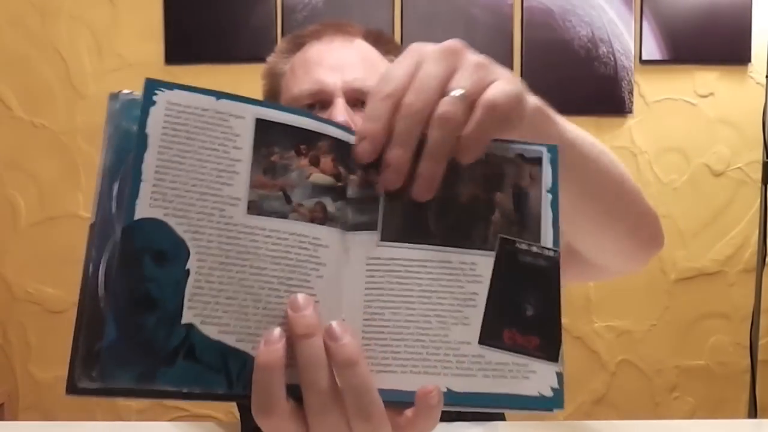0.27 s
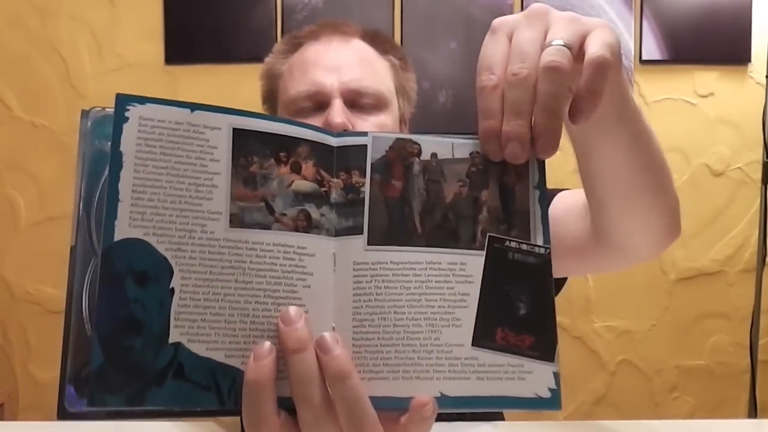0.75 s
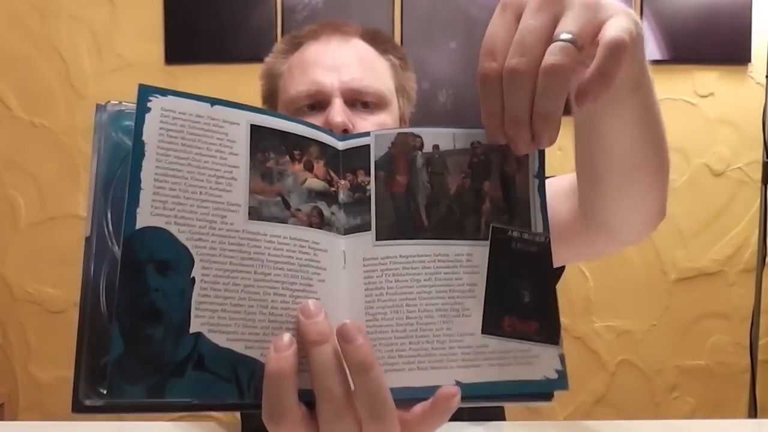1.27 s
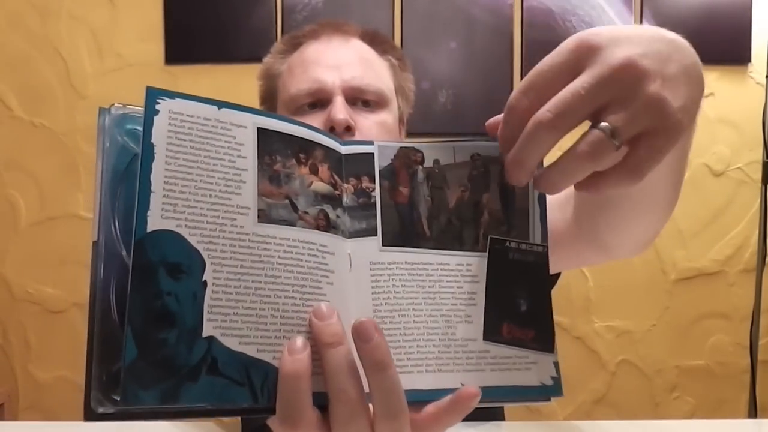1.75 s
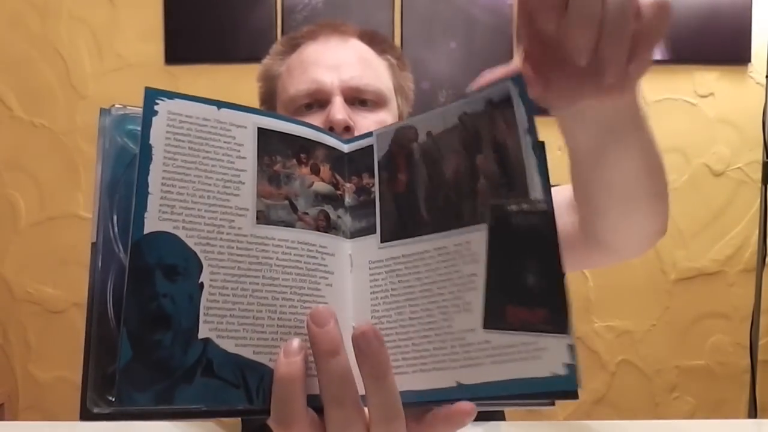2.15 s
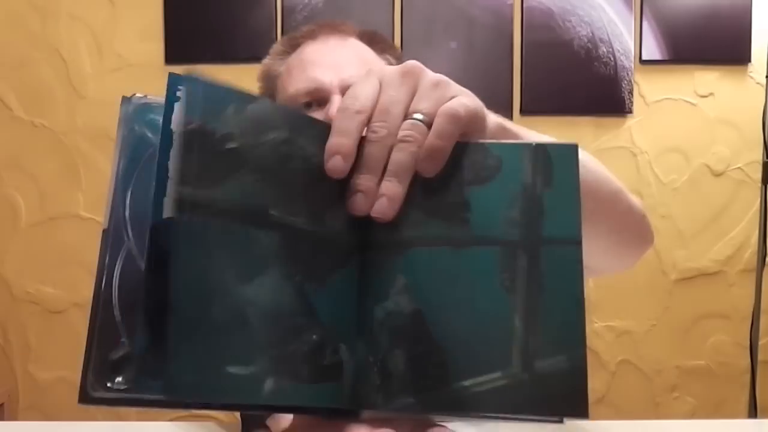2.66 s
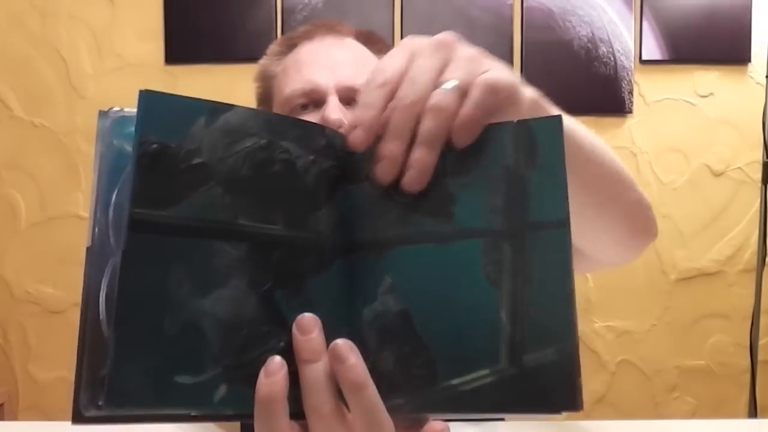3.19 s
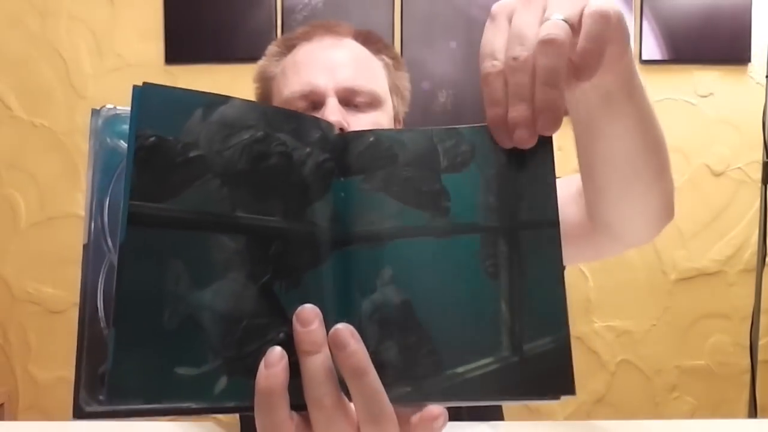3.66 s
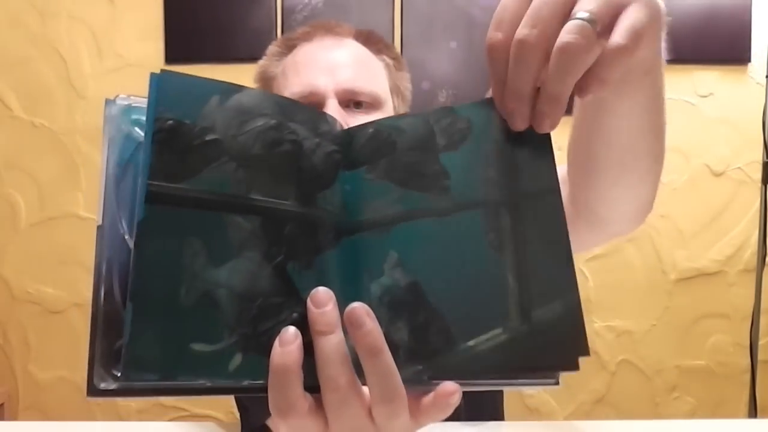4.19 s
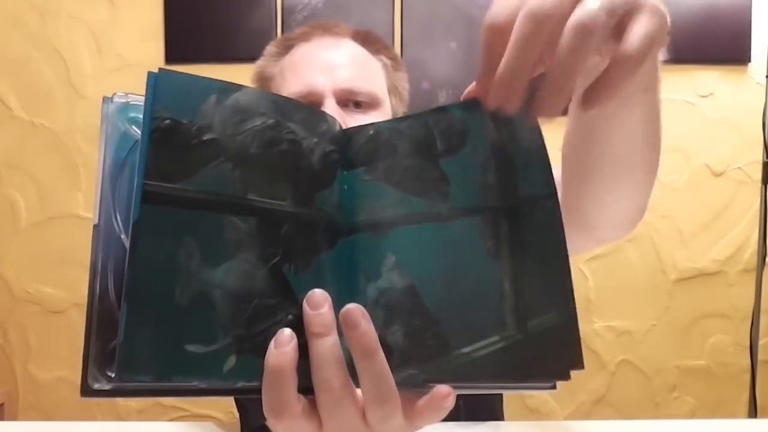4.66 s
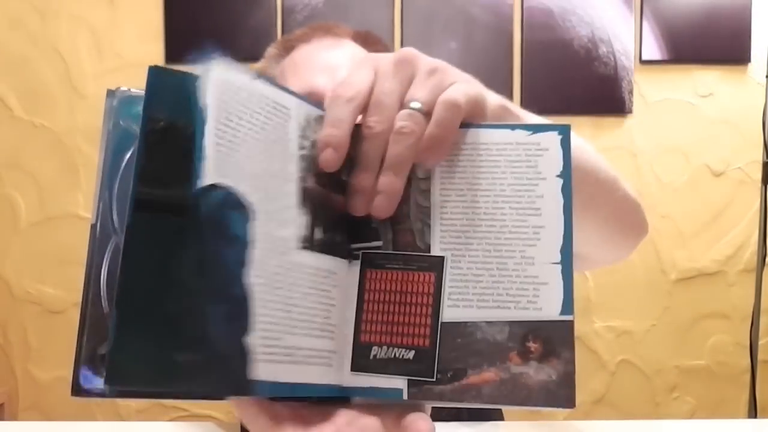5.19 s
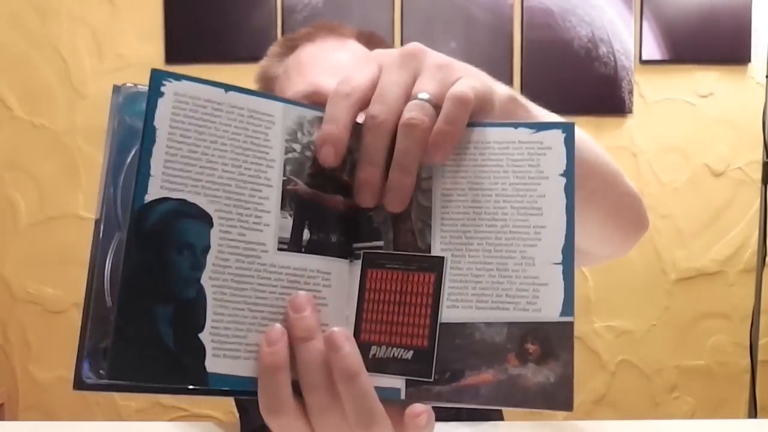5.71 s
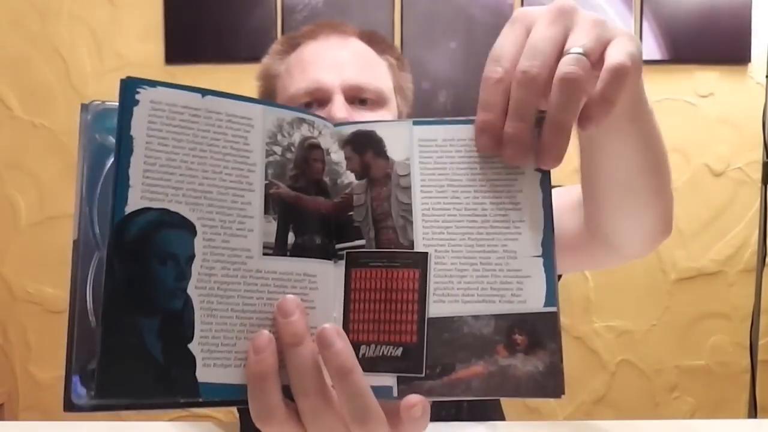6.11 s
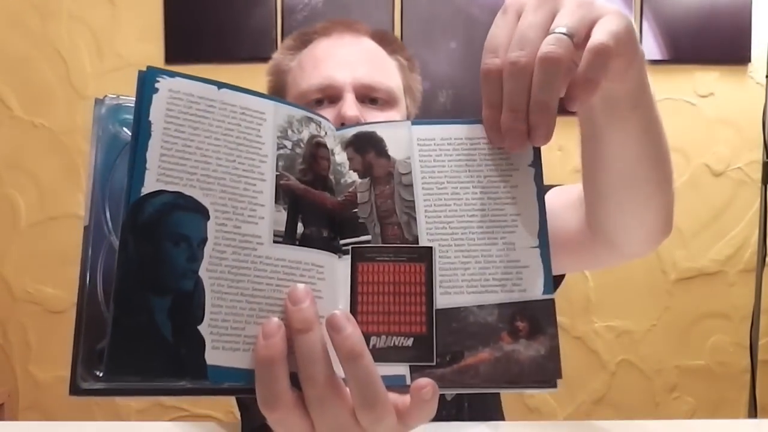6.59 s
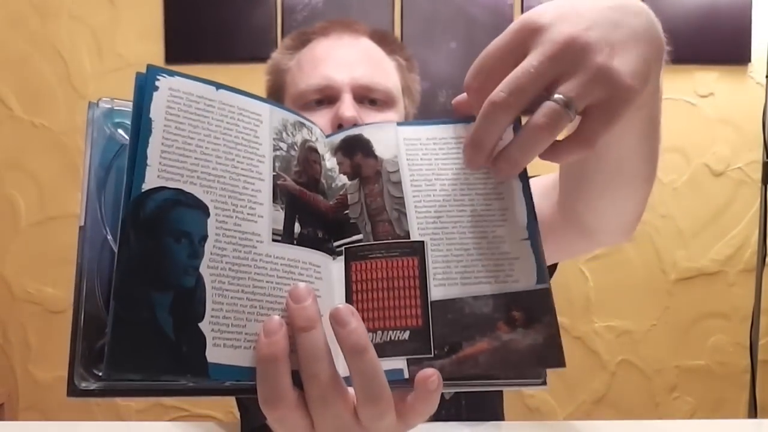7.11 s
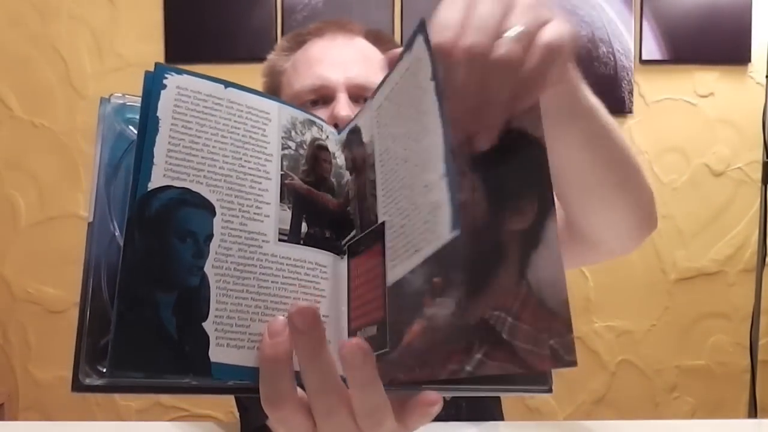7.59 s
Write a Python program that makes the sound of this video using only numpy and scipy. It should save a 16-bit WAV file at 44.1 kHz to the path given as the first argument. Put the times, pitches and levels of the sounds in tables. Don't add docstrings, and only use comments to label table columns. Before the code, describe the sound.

Close in front of the microphone, fingers leaf through a thick hardcover book. Faint touches and knocks come first, then bursts of crisp corner snaps, a page bumping over, an airy swish and slight binding creaks. Snaps return after four seconds, another page swings over, and the sharpest snap lands near seven seconds before the rustling thins. Small quiet room, short echo, faint hiss and mains hum.

```python
import sys
import numpy as np
from scipy import signal
from scipy.io import wavfile
from scipy.ndimage import uniform_filter1d

SR = 44100
rng = np.random.default_rng(int(sys.argv[2]) if len(sys.argv) > 2 else 0)


def wrap_up_sound(samples):
    columns = np.atleast_2d(samples).T
    tamed = np.clip(columns, -1, 1)
    steps = np.round(tamed * 32767).astype(np.int16)
    wavfile.write(sys.argv[1], SR, steps)


def voltage_ratio(level):
    return 10 ** (np.asarray(level, float) / 20)


N = 346185
LEAD_S = 0.005
BOARD_HZ = 1330


def evened(x):
    return x / np.sqrt(np.mean(x ** 2) + 1e-20)


def peaked(x, db):
    return voltage_ratio(db) * x / np.sqrt(uniform_filter1d(x ** 2, 44).max())


def read(points, hz):
    f, value = np.transpose(points)
    return np.interp(np.log(hz + 1), np.log(f + 1), value)


def add(mix, s, sound):
    start = max(round((s - LEAD_S) * SR), 0)
    part = mix[start:][:len(sound)]
    part += sound[:len(part)]


def sides(pan_db):
    return voltage_ratio(np.array([[pan_db], [-pan_db]]) / 2)


def colour(x, spectrum):
    hz = abs(np.fft.fftfreq(4096, 1 / SR))
    log_gain = np.log(voltage_ratio(np.maximum(read(spectrum, hz), -100)))
    taps = np.fft.ifft(np.exp(np.conj(signal.hilbert(log_gain)))).real[:2048]
    taps = taps / np.linalg.norm(taps)
    return signal.oaconvolve(x, taps[None], axes=-1)[:, :N]


def ring(x, hz, width_hz):
    r = np.exp(-np.pi * width_hz / SR)
    return signal.lfilter([1, 0, -1], [1, -2 * r * np.cos(2 * np.pi * hz / SR), r * r], x)


def resonate(x, hz, width_hz):
    turn = np.exp(2j * np.pi * np.cumsum(hz) / SR)
    r = np.exp(-np.pi * width_hz / SR)
    return (turn * signal.lfilter([1 - r], [1, -r], x / turn)).real


def facing_page(x, hz, share, spacing_hz):
    delay = np.round(hz / spacing_hz) / hz * SR
    at = np.arange(len(x))
    return x + share * np.interp(at - delay, at, x)


def slips(per_s, spread_db, clump_db, clump_s):
    size = voltage_ratio(spread_db * np.minimum(rng.exponential(1, N), 5))
    size = size * (rng.random(N) < per_s / SR)
    clumps = uniform_filter1d(rng.standard_normal(N), max(int(clump_s * SR), 2))
    clumps = evened(uniform_filter1d(clumps, 40))
    return evened(size * rng.standard_normal(N) * voltage_ratio(clump_db * clumps))


def burst(grit, build_s, crack_s, skid_db, skid_s):
    t = np.arange(len(grit)) / SR - LEAD_S
    before = (1 + voltage_ratio(skid_db)) * np.exp(-abs(t) / build_s)
    after = np.exp(-abs(t) / crack_s) + voltage_ratio(skid_db) * np.exp(-abs(t) / skid_s)
    return grit * np.where(t < 0, before, after)


def hush():
    # (pitch [Hz], rms level [dB])
    hum_tones = [(50, -87.5), (100, -93.5)]
    # (frequency [Hz], level [dB per Hz])
    hush_colour = [(12, -20), (20, -11), (53, -9.5), (126, -5.5), (208, -5.5), (385, -6), (1350, -2),
                   (2710, -12.5), (5150, -11), (10900, -13), (15700, -14.5)]
    t = np.arange(N) / SR
    hum = sum(voltage_ratio(db) * np.sqrt(2) * np.sin(2 * np.pi * hz * t) for hz, db in hum_tones)
    hiss = colour(rng.standard_normal((2, N)), hush_colour)
    return voltage_ratio(-63) * hiss + hum


def room(x):
    # (frequency [Hz], time to fall by 60 dB [s])
    echo_times = [(300, 0.36), (1200, 0.13), (4000, 0.12), (12000, 0.12)]
    taps = np.zeros((2, SR // 2))
    at = np.arange(200, SR // 2 - 20, 20) + rng.integers(0, 20, (2, (SR // 2 - 201) // 20))
    np.put_along_axis(taps, at, rng.choice([-1., 1.], at.shape), 1)
    hz, t, bands = signal.stft(taps, SR, nperseg=256)
    fading = voltage_ratio(-60 * t / read(echo_times, hz)[:, None])
    tail = signal.istft(bands * fading, SR, nperseg=256)[1]
    tail = tail / np.linalg.norm(tail[0])
    return signal.fftconvolve(x.mean(0)[None], tail, axes=1)[:, :N]


def swishes():
    # (start [s], length [s], level [dB], centre [Hz])
    swings = [
        (2.16, .17, -68, 10000),
        (3.244, 0.17, -61.5, 10500),
        (3.525, .11, -61.5, 9000),
        (5.15, 0.22, -59.5, 11900),
        (5.84, .16, -65, 11000),
        (6.04, .12, -68.5, 12000),
    ]
    out, air = np.zeros(N), rng.standard_normal(N)
    for s, length, db, hz in swings:
        part = air[round(s * SR):round((s + length) * SR)]
        along = np.linspace(0, 1, len(part))
        swell = np.sin(np.pi * along ** 1.1)
        add(out, s + LEAD_S, voltage_ratio(db) * evened(ring(part, hz, width_hz=11000)) * swell)
    return out


def creaks():
    # (start [s], end [s], first pitch [Hz], last pitch [Hz], level [dB])
    flexes = [
        (1.693, 1.776, 387, 383, -74.5),
        (2.165, 2.333, 119.2, 200, -78),
        (2.45, 2.55, 280, 328, -69.5),
        (3.471, 3.548, 405, 472, -73.5),
        (3.485, 3.7, 673, 652, -76),
    ]
    out, t = np.zeros(N), np.arange(N) / SR
    for start, end, from_hz, to_hz, db in flexes:
        along = np.clip((t - start) / (end - start), 0, 1)
        turns = np.cumsum(from_hz + (to_hz - from_hz) * along) / SR
        wander = uniform_filter1d(uniform_filter1d(rng.standard_normal(N), size=900), size=900)
        flutter = 1 + 0.5 * evened(wander)
        swell = np.sin(np.pi * along) ** 0.5
        out += voltage_ratio(db) * np.sqrt(2) * flutter * np.sin(2 * np.pi * turns) * swell
    return out


def hoots():
    # (start [s], length [s], pitch [Hz], level [dB])
    board_songs = [(1.204, 0.068, 1490, -52.5), (1.332, 0.047, 1440, -47.5), (2.513, 0.029, 1060, -76),
                   (2.719, 0.019, 1440, -47), (3.79, 0.063, 1250, -53.5), (4.135, 0.074, 1450, -47.5),
                   (5.35, 0.011, 1100, -54), (6.393, 0.24, 1280, -66.5), (6.586, 0.02, 1280, -56),
                   (6.699, 0.069, 2280, -51), (7.094, 0.017, 1480, -44)]
    out, rub = np.zeros(N), slips(per_s=6000, spread_db=2.2, clump_db=2, clump_s=0.006)
    for s, length, hz, db in board_songs:
        part = rub[round(s * SR):round((s + length) * SR)]
        along = np.linspace(0, 1, len(part))
        tone = evened(ring(ring(part, hz, width_hz=125), hz, width_hz=710))
        add(out, s + LEAD_S, voltage_ratio(db) * tone * np.sin(np.pi * along) ** 0.34)
    return out


def twangs():
    # (time of peak [s], peak level [dB], pitch [Hz], length [s])
    bends = [(.085, -55, 1300, 0.00092), (0.27, -50.5, 1220, 0.0019), (0.32, -46, 1100, 0.0016),
             (.33, -53, 1220, 0.0013), (0.421, -48.5, 1285, 0.0031), (1.1, -42, 1520, 0.00078),
             (1.408, -28, 1740, 0.00081), (1.436, -35, 1430, 0.0017), (1.946, -42, 3660, 0.0022),
             (1.9562, -27.5, 3700, 0.0017), (1.9565, -34.5, 7100, 0.0017), (1.955, -41, 2100, 0.0036),
             (2.132, -61, 1130, 0.005), (2.6625, -46, 1500, .0015), (2.677, -44, 1400, .0015),
             (2.707, -48, 1550, .002), (2.7287, -36, 1410, .0012), (2.7348, -37, 1480, 0.0013),
             (2.737, -46, 2560, 0.0012), (4.259, -37.5, 1750, 0.0005), (4.284, -33, 1600, 0.00089),
             (4.297, -39, 1480, 0.0015), (4.347, -40, 1890, 0.0006), (4.3649, -42, 1900, 0.0011),
             (4.7806, -34.5, 1370, 0.0011), (6.775, -38, 1030, 0.0013), (6.9676, -25, 1920, 0.00042),
             (6.9679, -28, 7000, 0.00046), (6.968, -35, 10600, .0006), (6.973, -61, 110, 0.0018),
             (6.9745, -38, 1950, 0.0014), (6.9782, -28.5, 1620, 0.00082), (6.989, -28, 1310, 0.0013),
             (7.206, -44, 2040, 0.0025), (5.408, -55, 2100, .0015), (2.989, -51, 2240, 0.0032),
             (5.357, -42, 1460, .002)]
    out, t = np.zeros(N), np.arange(600) / SR - LEAD_S
    for (s, db, hz, length), turn in zip(bends, rng.random(len(bends))):
        swell = np.exp(-(t / length) ** 2)
        swell = swell + 0.042 * (t > 0) * np.exp(-abs(t) / (2 * length))
        turns = hz * t * (1 - 8 * t) + (1 + turn) / 6
        add(out, s, voltage_ratio(db) * np.sqrt(2) * swell * np.sin(2 * np.pi * turns))
    return out


def knocks():
    # (time of peak [s], peak level [dB], board pitch [Hz])
    bumps = [(0.1577, -49, 1330), (0.226, -47, 1200), (0.363, -50, 1180.0), (0.526, -52, 1100),
             (1.268, -42, 1020), (1.6635, -50, 1110), (2.5328, -35, 960), (2.679, -35, 1400),
             (2.723, -35, 1470), (3.084, -45, 1020), (3.807, -45, 1210), (3.9901, -36.5, 1540),
             (4.197, -39, 1320), (5.259, -41.5, 1600), (5.3543, -33.5, 1040), (5.5693, -52, 834),
             (5.6043, -54, 1040), (5.6197, -48, 1130), (5.625, -44.5, 1110), (5.74, -40, 1150),
             (3.2325, -40.5, 1040), (6.166, -40, 1170), (6.212, -48, 1250), (6.591, -39, 1220),
             (6.973, -30, 1490), (6.984, -40, 1500), (7.288, -61, 1270.0), (7.6, -50.5, 1030)]
    board = np.zeros(N)
    for (s, db, hz), grit in zip(bumps, rng.standard_normal((len(bumps), 1500))):
        blow = burst(grit, build_s=0.00073, crack_s=0.0037, skid_db=-30, skid_s=0.012)
        thud = ring(ring(blow, hz, width_hz=310), hz, width_hz=400)
        add(board, s - 0.0009, peaked(thud, db - 7.5))
    return board


def pecks():
    # (time [s], sheet peak [dB], sheet pitch [Hz], board peak [dB])
    single_slips = [(.0845, -68, 3020, -60), (.1405, -59, 4500, -59), (.181, -54, 5070, -62),
                    (.202, -62, 5000, -61), (.2705, -58, 4500, -60), (0.3189, -46.5, 4700, -46),
                    (0.33, -53, 5000, -54), (0.417, -63, 4000, -54), (.49, -62, 3000, -54),
                    (.555, -64, 6500, -59), (1.0034, -52, 4500, -50), (1.526, -49, 6300, -47),
                    (1.638, -58, 4000, -58), (1.746, -45.5, 6300, -49), (1.771, -49, 4000, -58),
                    (1.7956, -40, 4220, -42), (1.9561, -39, 3750, -37.5), (2.108, -60, 3500, -62),
                    (2.588, -54, 5000, -60), (2.701, -49, 4000, -49), (2.9255, -65, 6900, -64),
                    (3.1487, -56, 3500, -48), (3.2317, -51, 3600, -62), (3.392, -70, 3000, -75),
                    (4.021, -54, 4200, -44), (4.0372, -43, 6540, -43), (4.259, -33, 4480, -34.5),
                    (4.282, -34, 4500, -34), (4.408, -46, 4300, -44), (4.5255, -60, 4500, -54),
                    (4.63, -54, 3500, -73), (4.6962, -58, 3000, -55), (4.714, -54, 3700, -57),
                    (4.7532, -54, 6800, -64), (4.931, -58, 4000, -54.5), (5.422, -60, 5500, -58),
                    (5.5148, -64, 4000, -57), (5.589, -56, 6500, -55), (5.685, -54, 3500, -57),
                    (5.6978, -54, 4000, -52), (5.77, -60, 5500, -60), (5.783, -51, 7500, -60),
                    (6.484, -56, 4200, -53), (6.888, -53, 4000, -50), (6.893, -56, 4200, -51),
                    (6.9672, -24.5, 4000, -27), (7.0616, -44, 4000, -39), (7.142, -52, 8000, -54),
                    (7.4155, -59, 5000, -57), (7.657, -56, 5000, -66)]
    sheet, board = np.zeros((2, N))
    lead = round(LEAD_S * SR)
    grits = rng.standard_normal((len(single_slips), 1200))
    for (s, sheet_db, hz, board_db), grit in zip(single_slips, grits):
        slip = 0.3 * burst(grit, build_s=0.0001, crack_s=0.0006, skid_db=-14, skid_s=0.003)
        slip[[lead, lead + 38]] += [-2, 1.3]
        paper = evened(slip) + 0.42 * evened(ring(slip, hz, width_hz=720))
        add(sheet, s, peaked(paper, sheet_db))
        add(board, s, peaked(ring(ring(slip, 1180, width_hz=330), 2120, width_hz=410), board_db))
    return sheet, board


def snaps():
    # (time of peak [s], peak level [dB], sheet pitch [Hz])
    ticks = [(.008, -47.5, 6400), (.1102, -49, 5000), (1.2976, -35, 5300), (1.5009, -35.5, 7100),
             (1.5193, -41, 6750), (1.5463, -42, 6300), (1.6682, -43, 10200), (1.7368, -46.5, 5560),
             (1.8065, -45, 7500), (1.9472, -36.5, 6900), (2.6117, -47, 3040), (2.7514, -45.5, 6600),
             (2.9388, -47, 6700), (3.0517, -47, 2970), (3.851, -48, 5500), (4.2529, -33, 6650),
             (4.2831, -33, 4400), (4.7856, -45, 8500), (4.851, -57, 5100), (5.0187, -41, 11200),
             (5.155, -45, 3200), (4.2395, -48, 4500), (5.318, -49, 3900), (5.7886, -44, 4600),
             (5.815, -53, 7000), (6.6169, -40.5, 7400), (6.6342, -41.5, 7550), (7.1125, -42, 8200),
             (7.346, -52, 5900), (7.6333, -55, 5260)]
    cracks = [(1.0783, -49, 4200), (1.4086, -24.5, 7230), (1.4632, -31.5, 6300), (1.4822, -36.5, 7040),
              (1.6522, -40.5, 7200), (1.7962, -41, 3470), (1.8373, -47.5, 8000), (1.9562, -30, 3850),
              (2.1392, -42.5, 3380), (2.4994, -42.5, 5500), (2.6615, -45.5, 4800), (3.998, -43, 4740),
              (4.2605, -31.5, 4600), (4.3227, -31.5, 8340), (4.3427, -33.5, 4730), (4.3652, -33.5, 6300),
              (4.6013, -48, 3200), (5.1108, -44, 3050), (5.7068, -52, 4230), (5.7355, -46.5, 3600),
              (6.9354, -52, 4120), (6.9652, -35, 5570), (7.0524, -46, 6630), (7.0651, -44, 3820),
              (7.0953, -30.5, 7700), (7.1302, -40, 3830), (7.431, -41.5, 4930), (7.45, -41, 4970),
              (7.5117, -56, 3700), (7.8167, -44, 4560)]
    claps = [(.3215, -58, 4930), (.4737, -54.5, 4040), (.9767, -51.5, 2960), (1.0607, -49, 3770),
             (1.1, -34.5, 3780), (1.1983, -52, 6800), (1.4361, -32.5, 6950), (1.6097, -46.5, 3400),
             (2.676, -56, 4000), (3.1712, -47, 3030), (3.9538, -41, 5200), (4.3022, -39, 7100),
             (4.7785, -33.5, 2880), (4.8098, -45, 4650), (5.7238, -43.5, 5960), (6.778, -32, 10100),
             (6.9035, -56, 4000), (6.912, -53, 4200), (6.924, -47.5, 3740), (7.017, -43, 10300),
             (7.1778, -39, 7800), (7.2065, -37.5, 3980)]
    slaps = [(.267, -56.5, 4560), (.4213, -52, 3830), (2.736, -47, 2840), (2.973, -51.5, 6440),
             (2.9894, -68, 5700), (4.544, -48, 4600), (5.341, -47.5, 4250), (5.3604, -48, 5140),
             (5.846, -59, 4500)]
    for_boards = [(ticks, -10), (cracks, -7.5), (claps, -1), (slaps, 6.5)]
    sheet, board = np.zeros((2, N))
    for rows, board_db in for_boards:
        grits = rng.standard_normal((len(rows), 2, 1500))
        for (s, db, hz), (sheet_grit, board_grit) in zip(rows, grits):
            crack = burst(sheet_grit, build_s=0.0006, crack_s=0.0003, skid_db=-11, skid_s=0.0032)
            crack[round(LEAD_S * SR)] -= 2.5
            crack = facing_page(crack, hz, share=0.18, spacing_hz=1920)
            crack = evened(crack) + 0.52 * evened(ring(crack, hz, width_hz=640))
            add(sheet, s, peaked(crack, db + 0.033))
            shake = burst(board_grit, build_s=0.0008, crack_s=0.0008, skid_db=-16, skid_s=0.011)
            shake = evened(shake) + 0.7 * evened(ring(shake, 1.35 * BOARD_HZ, width_hz=700))
            add(board, s - 0.0008, peaked(shake, db + board_db - 5.0))
    return sheet, board


def strokes():
    # (start [s], length [s], board ring [dB], board pitch [Hz])
    scuff_rows = [(0.001, 0.32, -70, 1120), (1.094, 0.051, -58, 1290), (1.343, 0.034, -65, 1440),
                  (2.519, 0.026, -49, 1000), (2.542, 0.038, -55, 1200), (2.59, 0.1, -57.5, 1450),
                  (2.669, 0.085, -47, 1480), (3.799, 0.074, -61, 1260), (4.144, 0.12, -62.5, 1470),
                  (4.367, 0.056, -55.5, 820), (5.105, 0.088, -57, 930), (5.344, 0.078, -59, 1060),
                  (5.423, 0.26, -67, 1120), (6.96, 0.039, -38.5, 1510)]
    # (start [s], length [s], sheet hiss at start [dB], board ring [dB], sheet pitch [Hz])
    flick_rows = [(.321, 0.012, -74, -57, 4800), (.724, 0.025, -63, -68, 4500),
                  (1.062, 0.021, -55, -64, 4100), (1.219, 0.053, -39.5, -59, 4670),
                  (1.378, 0.038, -67, -74, 4100), (1.609, 0.014, -48, -56, 6800),
                  (1.953, 0.0065, -34.5, -51, 3860), (2.752, 0.048, -60, -54, 4900),
                  (2.801, 0.055, -67, -62, 7740), (3.956, 0.023, -43.5, -49, 4800),
                  (3.99, 0.039, -46, -56, 4830), (4.247, 0.015, -49, -69, 6650),
                  (5.0125, 0.0079, -49.5, -59, 3300), (5.312, 0.014, -52, -59, 4300),
                  (6.999, 0.049, -54, -49, 4020), (7.061, 0.01, -44, -59, 3900),
                  (7.116, 0.058, -53.5, -54, 4060)]
    # (start [s], length [s], sheet hiss at start [dB], board ring [dB], sheet pitch [Hz])
    ease_rows = [(.337, 0.24, -68.5, -73, 4100), (1.296, 0.085, -38, -48.5, 4000),
                 (1.403, 0.12, -50, -52, 6860), (1.53, 0.062, -59, -64, 6060),
                 (1.732, 0.059, -54, -63, 5050), (2.015, 0.11, -63, -69.5, 3730),
                 (2.993, 0.12, -60, -63, 3100), (3.603, 0.12, -68, -69, 4720),
                 (3.867, 0.073, -58.5, -69, 6760), (4.406, 0.094, -52.5, -57.5, 4350),
                 (4.558, 0.067, -56, -58.5, 4600), (5.301, 0.078, -51.5, -56.5, 4600),
                 (6.209, 0.066, -50, -61.5, 5360), (6.46, 0.12, -56.5, -66.5, 4040),
                 (6.862, 0.13, -64, -61.5, 4120), (7.518, 0.096, -65.5, -66, 5000)]
    # (start [s], length [s], sheet hiss at end [dB], board ring [dB], sheet pitch [Hz])
    grip_rows = [(.91, 0.055, -63.5, -70, 6940), (.973, 0.053, -52, -58.5, 3500),
                 (1.194, 0.029, -44, -54, 7200), (1.623, 0.074, -60, -61.5, 7650),
                 (1.931, 0.021, -49, -58, 3630), (2.123, 0.026, -45, -48.5, 3600),
                 (2.861, 0.12, -67, -73, 8750), (2.978, 0.015, -49.5, -58, 5600),
                 (3.14, 0.24, -57.5, -67.5, 8100), (3.48, 0.11, -65.5, -72, 7800),
                 (3.751, 0.11, -58, -64, 4500), (3.942, 0.013, -45, -62, 5300),
                 (4.502, 0.046, -66, -63.5, 4470), (4.879, 0.1, -63, -72, 5270),
                 (5.974, 0.19, -68, -111, 5300), (6.276, 0.2, -61, -94, 5230),
                 (6.577, 0.037, -47.5, -60.5, 6500), (7.624, 0.016, -52.5, -70, 5180),
                 (7.815, 0.042, -67, -58.5, 4800)]
    # (start [s], length [s], sheet hiss [dB], board ring [dB], sheet pitch [Hz])
    slide_rows = [(1.803, 0.045, -50, -60, 7530), (1.962, .053, -58, -59, 3600),
                  (2.149, 0.18, -61, -66, 8000), (4.034, 0.19, -54, -53, 6650),
                  (4.237, 0.15, -55, -52.5, 4740), (4.543, 0.015, -46.5, -52.5, 5000),
                  (4.767, 0.058, -51, -54, 2920), (4.82, 0.062, -62, -69, 5120),
                  (2.499, 0.085, -66, -61, 4370), (5.154, 0.16, -58.5, -61, 7660),
                  (5.698, 0.17, -62.5, -64.5, 5450), (5.864, 0.11, -68.5, -73, 4920),
                  (6.146, 0.064, -67, -75, 5400), (6.61, 0.087, -47, -58.5, 3620),
                  (6.689, 0.0833, -46, -53, 6150), (6.783, 0.08, -57.5, -54.5, 6540),
                  (7.055, 0.063, -50.5, -49.5, 4160), (7.176, 0.055, -50, -55.5, 6940),
                  (7.198, 0.03, -51, -56.5, 4600), (7.227, 0.09, -63, -64.5, 7800),
                  (7.428, 0.029, -59, -53, 4930), (7.449, 0.04, -51.5, -51, 4800),
                  (7.483, 0.038, -58.5, -67, 3540)]
    rest_hz = 4600
    sheet, board, hz = voltage_ratio(-92) * np.ones(N), voltage_ratio(-99.5) * np.ones(N), rest_hz * np.ones(N)
    scuffs = [(s, length, db - 12.5, db, rest_hz) for s, length, db, f in scuff_rows]
    # (strokes, where along them the hiss level holds [0 to 1], change over the stroke [dB])
    kinds = [(scuffs, 0.5, 0), (flick_rows, 0, -8.5), (ease_rows, 0, -14),
             (grip_rows, 1, 12.5), (slide_rows, 0.5, -1.5)]
    for rows, given_at, slope_db in kinds:
        for s, length, sheet_db, board_db, f in rows:
            span = slice(round(s * SR), min(round((s + length) * SR), N))
            along = np.linspace(0, 1, span.stop - span.start)
            lift = np.minimum((1 - along) / 0.14, 1)
            sheet[span] += lift * voltage_ratio(sheet_db + slope_db * (along - given_at))
            board[span] += voltage_ratio(board_db + 0.22 * slope_db * (along - 0.5) - 5.5)
            hz[span] = f * (1 + 0.061 * (along - 0.5))
    board_hz = BOARD_HZ * np.ones(N)
    for s, length, _, f in scuff_rows:
        board_hz[round(s * SR):round((s + length) * SR)] = f
    return uniform_filter1d(sheet, size=90), uniform_filter1d(board, size=300), hz, board_hz


def slides():
    # (time [s], fizz over the hiss [dB])
    touch = [(.0, -3), (.6, -3), (.8, -12.5), (2.1, -16), (2.2, -9.5), (2.9, -7.5), (3.0, -14), (3.15, -11),
             (4.4, -6), (4.85, -13.5), (5.1, -3), (5.7, -28), (5.95, 2), (6.3, -49), (6.6, -22), (6.8, -3),
             (7.2, -19), (7.65, -3.5)]
    sheet_gain, board_gain, sheet_hz, board_hz = strokes()
    grit = slips(per_s=16000, spread_db=1.8, clump_db=1.3, clump_s=0.005)
    grit = facing_page(grit, sheet_hz, share=0.45, spacing_hz=2100)
    sheet = evened(grit) + 0.51 * evened(resonate(grit, sheet_hz, width_hz=2950))
    sheet = evened(sheet) * sheet_gain
    fizz_db = np.interp(np.arange(N) / SR, *np.transpose(touch))
    fizz = signal.sosfiltfilt(signal.butter(2, 8200, "high", fs=SR, output="sos"), sheet)
    sheet += (voltage_ratio(1.25 * (fizz_db + 7.0)) - 1) * fizz
    rub = slips(per_s=6000, spread_db=2.2, clump_db=2.3, clump_s=0.007)
    board = evened(rub + 0.3 * evened(resonate(rub, board_hz, width_hz=400))) * board_gain
    swing = abs(uniform_filter1d(board_gain, int(0.035 * SR)))
    push = slips(per_s=2000, spread_db=4.5, clump_db=5.5, clump_s=0.0123)
    push = push * voltage_ratio(-27.5) * swing ** 0.68
    return sheet, board, push


def scene():
    # (frequency [Hz], level [dB per Hz])
    sheet_colour = [(1350, -26.5), (2300, -1), (3070, -5.5), (3880, -1.5), (5800, -1), (7030, 0),
                    (8950, -3), (10500, -3), (11800, -6.5), (15700, -17.5)]
    board_colour = [(320, -35.5), (550, -10.5), (768, -10), (1010, -3.5), (1500, -7), (2900, -13),
                    (3770, -15.5), (6380, -120)]
    push_colour = [(35, -56), (60, -22.5), (173, -9), (220, -5), (607, -1.5), (750, -8.5), (980, -57),
                   (1650, -120)]
    sheet, board, push = slides()
    crack, shake = snaps()
    slip, tap = pecks()
    dull = signal.sosfilt(signal.butter(1, 13500, fs=SR, output="sos"), crack + slip)
    push = push + voltage_ratio(-9.0) * shake
    covers = colour((board + shake)[None], board_colour) + knocks() + tap + hoots() + twangs()
    book = sides(-2.05) * colour((sheet + dull)[None], sheet_colour)
    book = book + sides(2.3) * covers
    book = book + sides(1.7) * colour(push[None], push_colour) + creaks()
    return book + voltage_ratio(-10.0) * room(book) + hush() + swishes()


def roll_off(x):
    return signal.sosfilt(signal.butter(12, 16660, fs=SR, output="sos"), x)


def record(dry):
    edge = signal.firwin(601, 15800, window=("kaiser", 9), fs=SR)
    mix = signal.oaconvolve(dry, edge[None], "same")
    return roll_off(mix)


dry = scene()
out = record(dry)
wrap_up_sound(out)
```